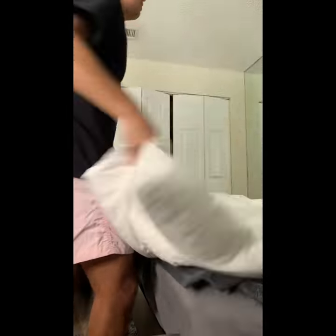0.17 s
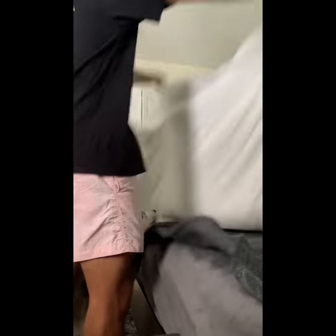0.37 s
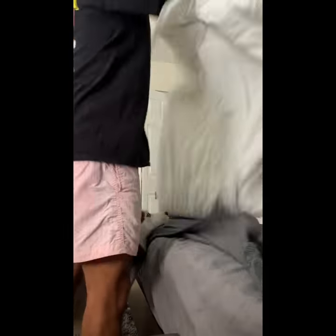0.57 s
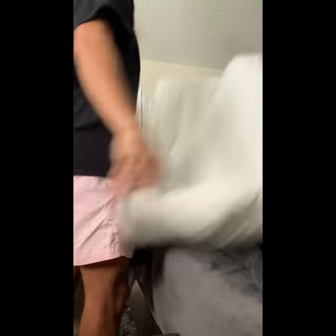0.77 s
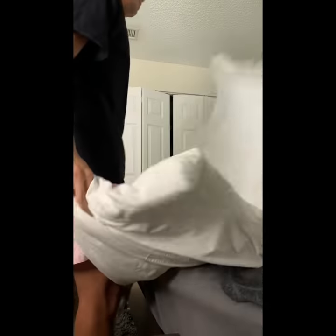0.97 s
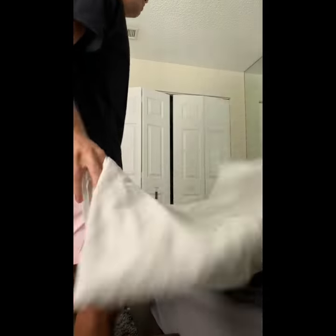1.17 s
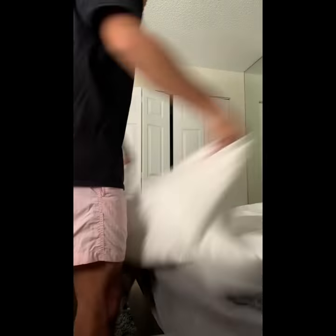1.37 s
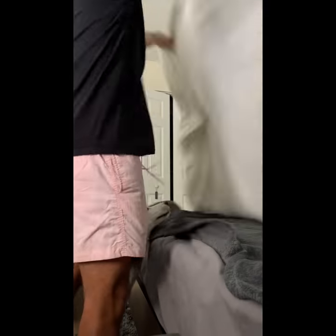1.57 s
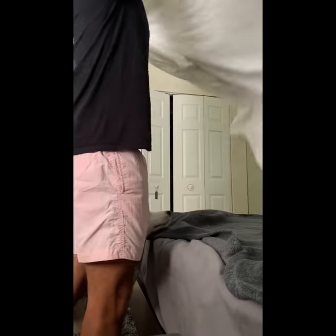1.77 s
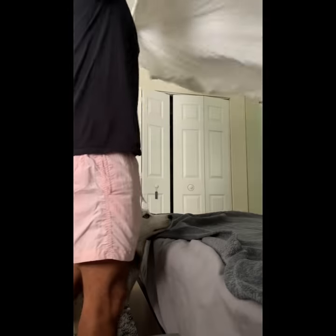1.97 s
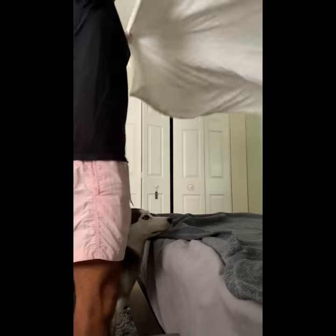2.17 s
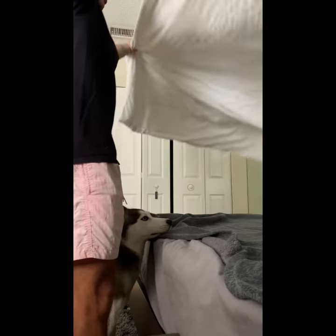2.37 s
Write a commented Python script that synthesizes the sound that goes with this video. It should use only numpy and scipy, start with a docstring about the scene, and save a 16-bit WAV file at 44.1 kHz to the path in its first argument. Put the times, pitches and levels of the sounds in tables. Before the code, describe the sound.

A quilt is lifted and shaken hard over a bed, close to the microphone: dull billowing whooshes, cloth snaps and low thumps, then a lighter rustling shake, fading to near quiet in a small soft bedroom.

```python
"""A faint low drone in a small soft bedroom, then a quilt is lifted and shaken out over a bed close by.
Five layers of grainy, coloured noise make the cloth: low billows, flaps, creases rustling, scuffs and swishes.
Short enveloped tones make the quilt snap taut or slap down, with a short dull room tail behind them.
Narrow low noise makes the drone and wide coloured noise the air; the treble is slightly earlier in the
left channel than in the right."""
import sys
import numpy as np
from scipy import signal
from scipy.fft import rfft, irfft
from scipy.io import wavfile
from scipy.ndimage import uniform_filter1d

SR = 44100
rng = np.random.default_rng(int(sys.argv[2]) if len(sys.argv) > 2 else 0)


def dump_mix(stems):
    """Bounce the given channels to the path in sys.argv[1] as a 16-bit WAV at rate SR."""
    frames = np.atleast_2d(stems).T  # one column per channel
    limited = np.clip(frames, -1, 1)  # hard clip at full scale
    pcm = np.round(limited * 32767).astype(np.int16)
    wavfile.write(sys.argv[1], SR, pcm)


N = 105840  # samples, 2.4 s
LEFT_RIGHT = np.array([[1], [-1]])  # opposite signs for the two channels
EVEN_S = 0.051  # loudness is evened out over about this long, so that the level curves lead


def undb(db):
    """Turn decibels into an amplitude factor."""
    return 10 ** (np.asarray(db) / 20)


def unit(x):
    """Scale a signal to rms 1."""
    return x / np.sqrt(np.mean(x ** 2))


def follow(t, times, levels_db):
    """Gain that glides in dB along a level curve."""
    return undb(np.interp(t, times, levels_db))


def colour(x, table):
    """EQ a signal along a curve drawn over log frequency, rms 1; -80 dB outside the curve."""
    hz, db = np.array(table, float).T
    f = np.maximum(np.fft.rfftfreq(N, 1 / SR), 1)
    curve_db = np.interp(np.log(f), np.log(hz), db, left=-80, right=-80)
    return unit(irfft(rfft(x) * undb(curve_db), N))


def even_out(x, power, floor):
    """Divide a signal by its short-time loudness; the floor spares the quietest moments."""
    return x / np.sqrt(uniform_filter1d(power, int(EVEN_S * SR)) + floor)


def wide(width):
    """Two-channel noise: a shared part and a part of opposite sign."""
    mid, side = rng.standard_normal((2, N))
    return mid + width * side * LEFT_RIGHT


PATCH_S, PATCH_DB = .03, 4.5  # analysis window, and spread of the band levels before smoothing


def patchy(x):
    """Every narrow band swells and fades at random, alike in both channels."""
    size = int(PATCH_S * SR)
    cells = signal.stft(x, nperseg=size)[2]
    swell = uniform_filter1d(rng.standard_normal(cells.shape[1:]), size=2, axis=1)
    swell = swell * 2 ** .5  # regain the spread lost by averaging two frames
    return unit(signal.istft(cells * undb(PATCH_DB * swell), nperseg=size)[1][:, :N])


# Colour of the still air: f/Hz, level/dB (relative)
AIR_COLOUR = [(30, -9), (55, 7), (120, -13), (250, 6.5), (600, -23), (2000, -28), (5000, -62), (16000, -55)]
AIR_DB, AIR_WIDTH = -61, 0.68  # rms level, share of opposite-sign noise


def air():
    """Steady bed of wide, mostly low noise with bands that swell and fade."""
    return undb(AIR_DB) * colour(patchy(wide(AIR_WIDTH)), AIR_COLOUR)


# Loudness of the room's low drone as the moving quilt stirs it: t/s, level/dB
DRONE_LEVEL = [(0.0, -40), (0.4, -34), (0.43, -26.5), (0.51, -43), (0.62, -26), (0.68, -31), (0.75, -58),
               (0.8, -27), (0.95, -45), (0.98, -35), (1.05, -34), (1.09, -31), (1.12, -36), (1.16, -33.5),
               (1.21, -52), (1.49, -26.5), (1.58, -47), (1.61, -37), (1.76, -45), (1.78, -45.5),
               (1.95, -42), (2.06, -58), (2.14, -42.5), (2.4, -44.5)]
# Colour of the drone: f/Hz, level/dB (relative)
DRONE_COLOUR = [(25, -29), (40, -17), (52, -10.5), (59, 4), (66, -8.5), (80, -32)]


def drone(t):
    """Narrow low noise, evened out, whose level follows its curve."""
    x = colour(rng.standard_normal(N), DRONE_COLOUR)
    x = even_out(x, x ** 2, 0.04)
    return x * follow(t, *np.array(DRONE_LEVEL).T)


ROOM_T60_S, ROOM_DB, ROOM_DULL_HZ = 0.23, -16.5, 2570  # decay time, tail level, treble roll-off
ROOM_WIDTH, ROOM_GAP_S = 0.13, .004  # share of opposite-sign noise, silence before the tail


def room(x):
    """Short, dull tail of a carpeted bedroom: decaying noise, different in each channel."""
    t = np.arange(SR // 2) / SR
    decay = np.exp(-np.log(1000) * t / ROOM_T60_S)
    tail = wide(ROOM_WIDTH)[:, :len(t)] * decay * (t > ROOM_GAP_S)
    tail = signal.sosfilt(signal.butter(1, ROOM_DULL_HZ, fs=SR, output="sos"), tail)
    tail = tail / np.sqrt(np.sum(tail ** 2) / 2)
    return x + undb(ROOM_DB) * signal.fftconvolve(x[None], tail, axes=1)[:, :N]


# The quilt snapping taut or slapping down:
# centre t/s, peak level/dB, pitch f/Hz, length/cycles (four times the spread of the rise)
SNAPS = [(.168, -29.5, 614, 0.83), (.2142, -19.5, 720, 1.9), (.223, -24, 170, 1.1), (.434, -12, 96, 1.2),
         (.588, -19, 464, 3.), (0.606, -14, 262, 3.4), (.604, -20.5, 764, 5.5), (.602, -18, 1640, 0.89),
         (0.746, -37, 1700, 14), (.811, -18.5, 147, 1.4), (.891, -13.5, 200, 0.44),
         (0.9645, -23, 890, 0.88), (.968, -14, 334, 1.13), (.9765, -5.5, 97.7, 1.5),
         (1.059, -29.5, 576, 2.2), (1.105, -21, 148, 0.44), (1.176, -44.5, 5200, 4.5),
         (1.334, -60, 655, 1.2), (1.406, -23.5, 830, 1.35), (1.443, -25, 500, 0.9), (1.511, -25, 704, 1.04),
         (1.416, -25, 1600, 1.3), (1.439, -35.5, 6540, 6.9), (1.488, -27, 92, 1), (1.758, -26, 193, 1.84),
         (1.926, -31.5, 201, 1.2), (1.955, -37, 200, 2.3), (2.385, -40, 278, 6.)]
SNAP_TAIL = 1.6  # the fall of a snap is this many times slower than its rise


def snaps(t):
    """Each snap is a brief push of air: a cosine under a lopsided bell envelope."""
    out = np.zeros(N)
    for at, db, hz, cycles in SNAPS:
        cycles_from_centre = (t - at) * hz
        spread = cycles / 4 * np.where(cycles_from_centre > 0, SNAP_TAIL, 1)
        bell = np.exp(-.5 * (cycles_from_centre / spread) ** 2)
        out += undb(db) * bell * np.cos(2 * np.pi * cycles_from_centre)
    return out


BIGGEST_PUFF = 3.5  # ceiling on puff size, in units of the scatter


def puffs(per_s, scatter_db, length_s, chance):
    """Envelope of random puffs with a sharp rise and a short fall, rms 1."""
    happens = chance[0] < per_s / SR
    size_db = scatter_db * np.minimum(-np.log(chance[1]), BIGGEST_PUFF)
    hits = uniform_filter1d(happens * undb(size_db), size=9)
    fall = np.exp(-1 / max(length_s * SR, 2))
    return unit(signal.lfilter([1], [1, -fall], hits))


# How hard the cloth works: t/s, then billow, flap, rustle, scuff and swish level/dB (GRAIN trims these)
CLOTH_LEVELS = [(0.0, -51, -58, -56, -62, -69), (0.1, -57, -53.5, -60.5, -55, -69),
                (0.15, -44, -54, -54.5, -60, -70.5), (0.17, -55, -34.5, -48, -55, -67.5),
                (0.2, -47, -50.5, -46, -56.5, -66), (0.21, -61, -26, -41, -53, -61),
                (0.24, -37, -32.5, -38.5, -56, -62.5), (0.34, -43, -34, -39.5, -48.5, -56.5),
                (0.41, -33.5, -28.5, -34.5, -41.5, -50.5), (0.44, -35.5, -24.5, -32.5, -42, -54),
                (0.53, -39.5, -39, -46, -55.5, -66), (0.56, -51, -39, -49, -50, -62.5),
                (0.59, -34.5, -18, -34.5, -42.5, -59), (0.61, -27, -26.5, -22, -35.5, -51),
                (0.62, -41, -18.5, -32, -41, -55.5), (0.73, -38.5, -34.5, -40, -47.5, -59.5),
                (0.74, -40.5, -34.5, -39.5, -40, -58), (0.78, -41, -34, -41, -52, -59.5),
                (0.81, -33, -28, -32.5, -44.5, -58.5), (0.93, -29.5, -26, -38, -47.5, -59),
                (0.97, -26, -23.5, -33.5, -45.5, -60.5), (1.04, -36, -37, -42, -57.5, -67.5),
                (1.1, -32, -28.5, -40, -52, -67.5), (1.15, -40, -45, -54, -58, -71),
                (1.18, -42, -39, -52.5, -58, -70.5), (1.22, -44, -38, -51, -59, -75),
                (1.29, -52.5, -65, -57, -57, -66.5), (1.32, -50, -45, -53.5, -55.5, -62.5),
                (1.34, -47, -40, -38.5, -49, -57.5), (1.4, -31.5, -34, -40, -49, -60),
                (1.48, -33, -28.5, -37, -42, -48.5), (1.54, -33.5, -32.5, -39.5, -42, -49),
                (1.6, -40.5, -40.5, -45, -55.5, -59.5), (1.62, -38, -32.5, -43, -51.5, -61),
                (1.65, -39.5, -38, -49.5, -53, -64), (1.74, -50, -49.5, -54.5, -61, -70.5),
                (1.76, -40, -36.5, -60, -63, -72), (1.78, -48, -45, -63, -61, -71),
                (1.84, -52, -58.5, -66, -64.5, -74), (1.96, -47.5, -48.5, -59, -65, -74.5),
                (2.04, -61, -76, -61, -62.5, -74.5), (2.14, -58, -72, -71.5, -71.5, -77.5),
                (2.23, -63, -68, -74.5, -74, -78), (2.27, -55, -54.5, -57.5, -66, -75),
                (2.34, -56, -58, -57.5, -64.5, -75.5), (2.4, -53, -43.5, -57, -62.5, -74)]
# Colour of each part: f/Hz, level/dB (relative)
BILLOW = [(50, -21), (72, -9.5), (92, -0.5), (125, -8.5), (160, -12.5), (260, -22)]
FLAP = [(100, -16), (160, -2.5), (260, 2.5), (350, -5.5), (450, -5), (600, -20.5), (1000, -27.5)]
RUSTLE = [(350, 1), (550, 0.5), (800, 1.5), (1200, -8.5), (2000, -14.5)]
SCUFF = [(900, -5), (1300, -0.5), (1900, -4), (2500, -7), (3600, -9.5), (5000, -40)]
SWISH = [(2500, -5), (4000, 0.5), (5500, -4), (7500, -7), (8600, -11), (11000, -9), (16000, -8.5)]
# Grain, one row per part from billow to swish:
# rate/(puffs per s), size scatter/dB, puff length/s, smooth share, level trim/dB, left minus right/dB
GRAIN = [(41, -12, 0.06, 0.65, 5, .5), (88.2, -8.5, 0.024, 0.55, -2, 1.96),
         (188, -0.5, 0.0034, 0.71, 0.5, -0.5), (410, 8, 0.0047, 0.89, 0.5, 0.4),
         (900, 9, 0.006, 0.84, 8.5, 0)]
# Stereo width, one value per part: share of opposite-sign noise
WIDTH = [.03, .2, .35, .65, .22]


def cloth(t):
    """Five parts of the moving quilt; all share the same creases, the finer parts have more of them."""
    rows, out = np.array(CLOTH_LEVELS), 0
    chance = rng.random((2, N)) + 1e-9
    for k, table in enumerate((BILLOW, FLAP, RUSTLE, SCUFF, SWISH)):
        per_s, scatter_db, length_s, smooth, trim_db, pan_db = GRAIN[k]
        grain = smooth + (1 - np.clip(smooth, 0, 1)) * puffs(per_s, scatter_db, length_s, chance)
        part = colour(patchy(wide(WIDTH[k])) * grain, table)
        part = even_out(part, np.mean(part ** 2, axis=0), 0.11)
        sides = undb(pan_db / 2 * LEFT_RIGHT)
        out = out + part * sides * follow(t, rows[:, 0], trim_db + rows[:, k + 1])
    return out


def scene():
    """Air and drone behind, snaps in their room, and the moving cloth in front."""
    t = np.arange(N) / SR
    background = air() + drone(t)
    return background + room(snaps(t)) + cloth(t)


LAG_S, LAG_FROM_HZ, LAG_BEND_HZ = 1 / 4200, 2600, 500  # treble lag, its onset and softness
BASS_CUT_HZ, TOP_HZ = 22.4, 15750


def record(dry):
    """The treble is slightly earlier in the left channel; the deep bass and the top are cut."""
    dry = signal.sosfilt(signal.butter(2, BASS_CUT_HZ, "high", fs=SR, output="sos"), dry)
    f = np.fft.rfftfreq(N, 1 / SR)
    # soft bend: near zero below the onset, rising with frequency above it
    above = LAG_BEND_HZ * np.logaddexp(0, (f - LAG_FROM_HZ) / LAG_BEND_HZ)
    lead = np.exp(1j * np.pi * LAG_S * above * LEFT_RIGHT)  # half the lag on each side
    stereo = irfft(rfft(dry) * lead, N)
    return signal.sosfilt(signal.ellip(10, .2, 80, TOP_HZ, fs=SR, output="sos"), stereo)


dry = scene()
out = record(dry)
dump_mix(out)
```